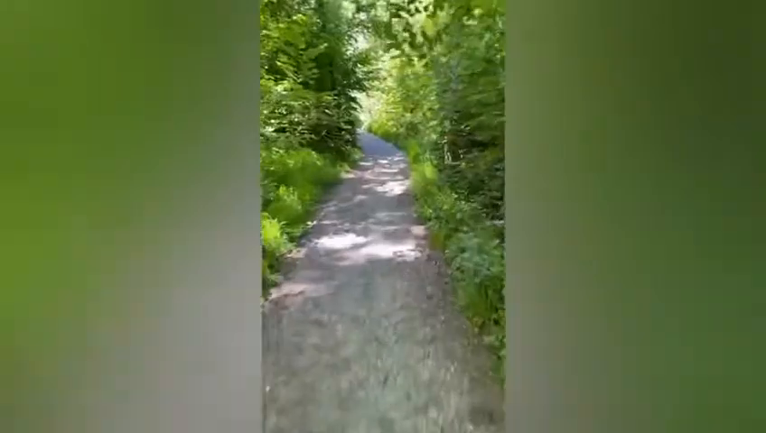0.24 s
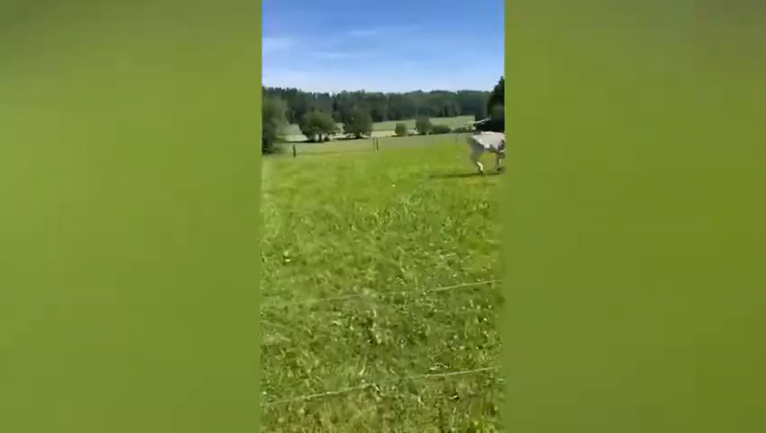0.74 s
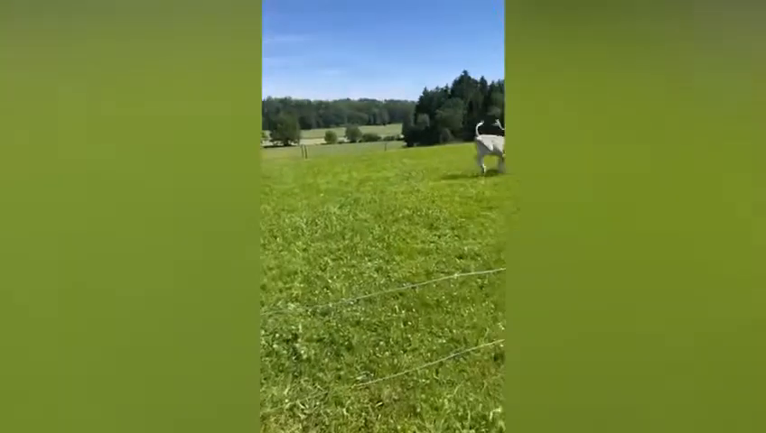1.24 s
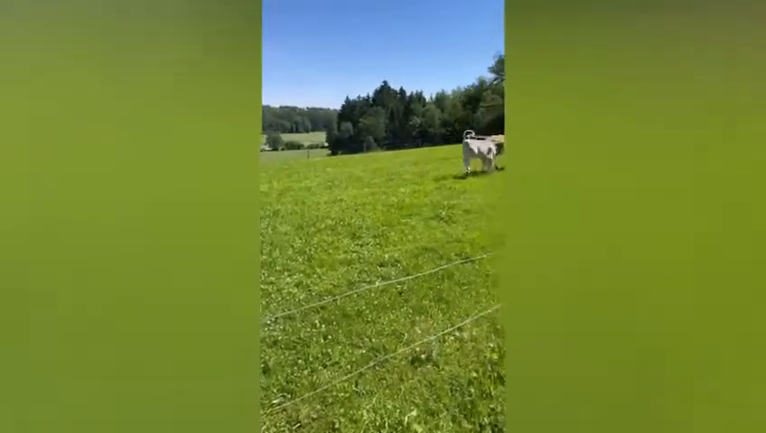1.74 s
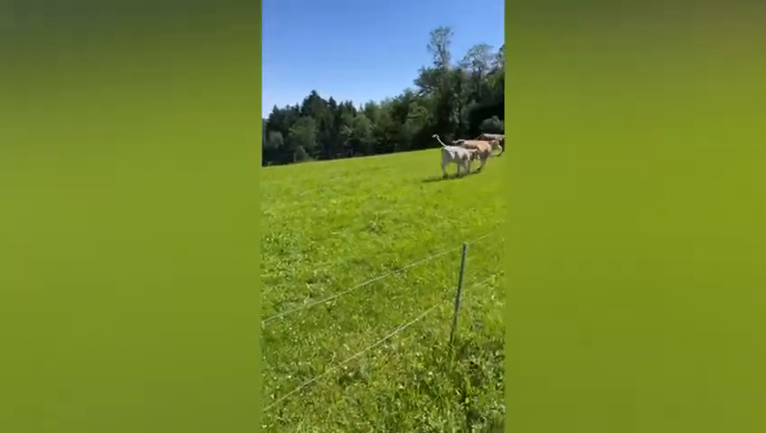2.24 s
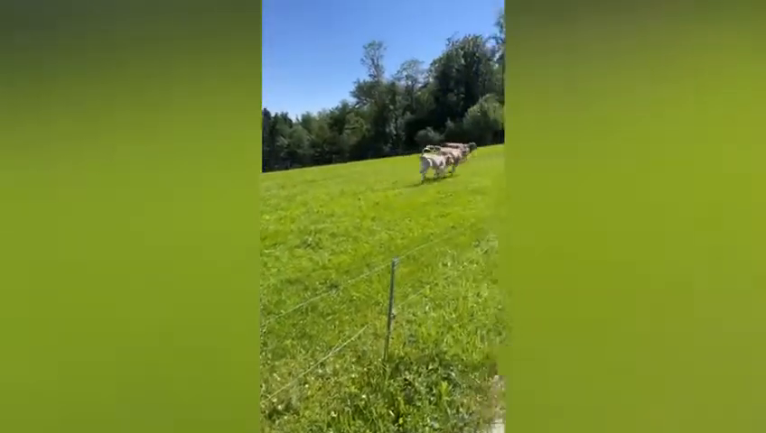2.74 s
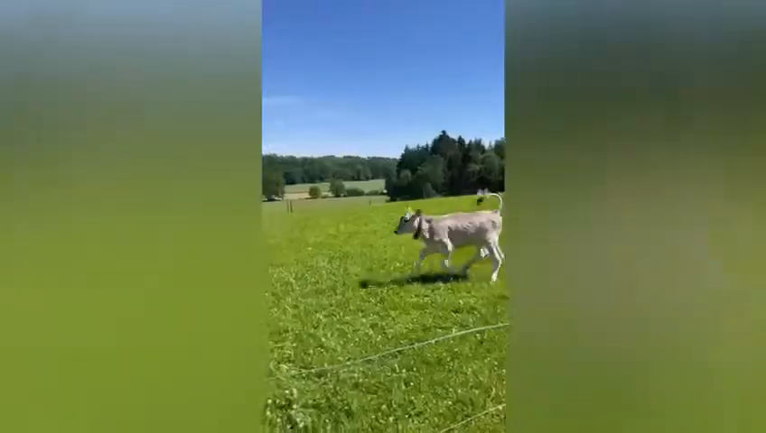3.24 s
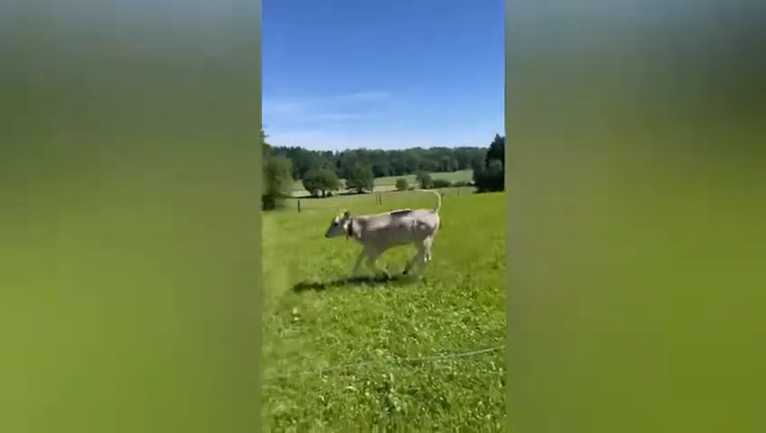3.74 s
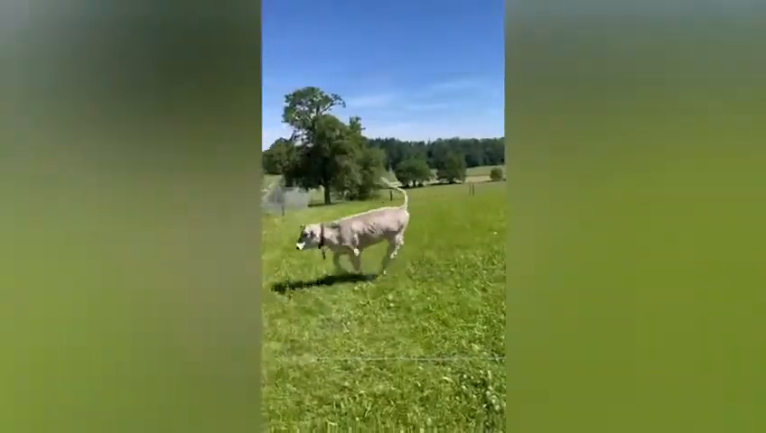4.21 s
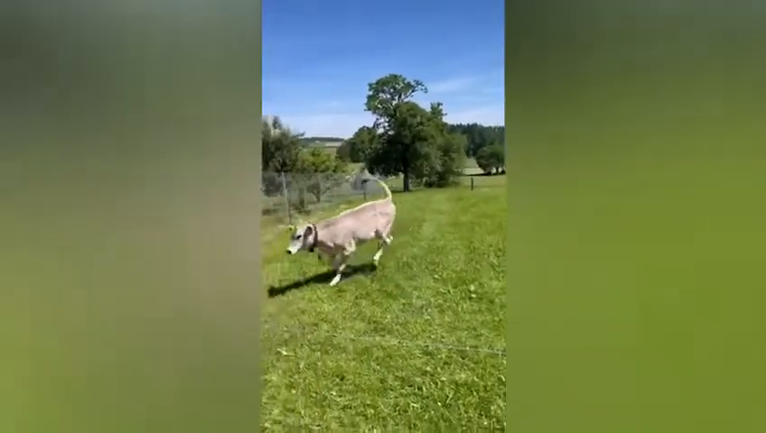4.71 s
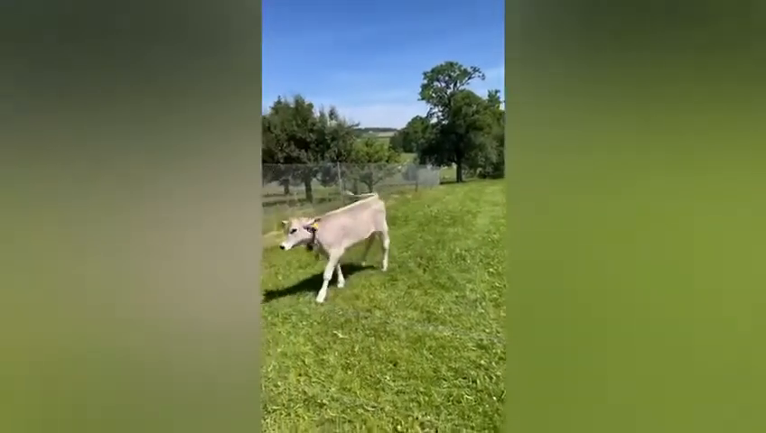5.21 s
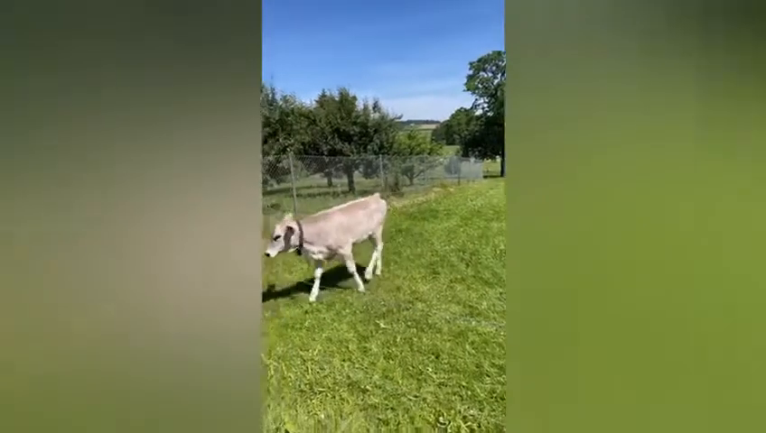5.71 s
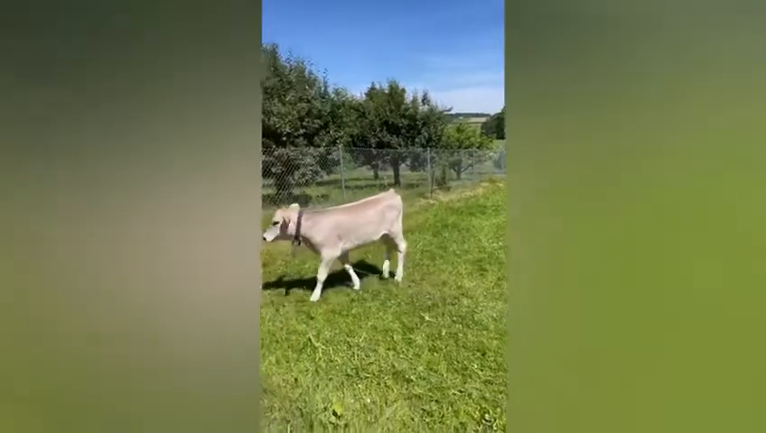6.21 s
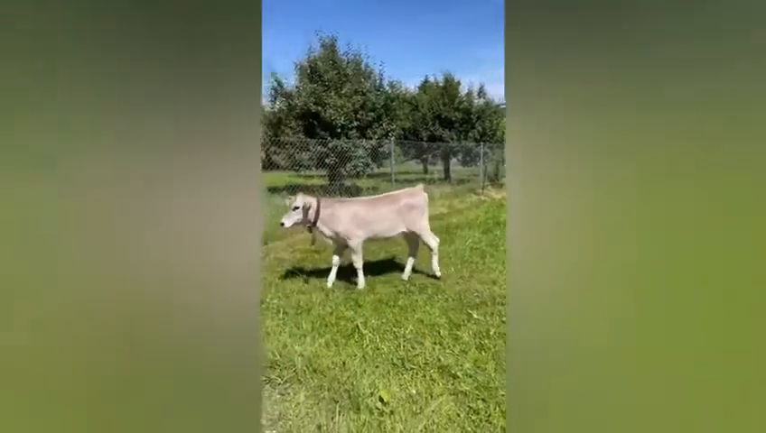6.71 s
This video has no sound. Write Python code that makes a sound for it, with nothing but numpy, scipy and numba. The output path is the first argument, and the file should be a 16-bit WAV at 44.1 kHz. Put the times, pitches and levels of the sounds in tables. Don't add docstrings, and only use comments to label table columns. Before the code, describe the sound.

Outdoors on a handheld phone: gritty gravel steps first, then a sudden change to a grassy field. Hollow, short cowbell clangs with bright metallic rim ringing and small clapper ticks tumble irregularly as cattle run by. Small birds chirp faintly behind. Another cut brings the bell of one trotting calf, its clanks thinning as it walks, while low wind buffets swell into heavy thumps. Dry open space, reduced high treble.

```python
import sys
import numpy as np
from scipy import signal
from scipy.fft import rfft, irfft
from scipy.io import wavfile
from scipy.ndimage import uniform_filter1d
from numba import njit

SR = 44100
rng = np.random.default_rng(int(sys.argv[2]) if len(sys.argv) > 2 else 0)


def int16_out(signal):
    q = np.round(np.clip(np.atleast_2d(signal).T, -1, 1) * 32767)
    wavfile.write(sys.argv[1], SR, q.astype(np.int16))


def boost(x):
    u = np.asarray(x, float) / 20
    return 10 ** u


N = 306936
TIME = np.arange(N) / SR


def colour(x, table):
    hz, db = np.transpose(table)
    f = np.maximum(np.fft.rfftfreq(x.shape[-1], 1 / SR), 1)
    gain = boost(np.interp(np.log(f), np.log(hz), db))
    return irfft(rfft(x) * gain, x.shape[-1])


def band(x, lo_hz, hi_hz):
    return signal.sosfilt(signal.butter(3, (lo_hz, hi_hz), "band", fs=SR, output="sos"), x)


def wander(rate_hz):
    hold = int(SR / rate_hz)
    steps = np.repeat(rng.standard_normal(N // hold + 1), hold)
    return 1.322 * uniform_filter1d(uniform_filter1d(steps, hold), hold)[:N]


# (f/Hz, lead/rad)
PORT_LEAD = [(0, 0), (1200, .25), (2400, .4), (3100, .8), (4500, 2.3), (4900, 3.3), (5150, 3.9),
             (5500, 5.9), (6000, 6.3), (6900, 7.3), (7900, 9.0), (9300, 9.5), (10200, 10.6), (11300, 12.0),
             (12500, 12.2)]


def ports(x, floor):
    f, lead = np.transpose(PORT_LEAD)
    half = np.exp(.5j * np.interp(np.fft.rfftfreq(N, 1 / SR), f, lead))
    spectrum = rfft(x) / np.maximum(np.abs(half.real), floor)
    return np.array([irfft(spectrum * turn, N) for turn in (half, half.conj())])


# (t/s, level/dB)
PATH_WIND = [(0, -45), (.3, -45.5), (.541, -48.5)]
FIELD_WIND = [(.54, -57), (.61, -48.5), (1.9, -50.5), (2.05, -46), (2.3, -50), (3.14, -48.5), (3.17, -42),
              (3.6, -43.5), (3.95, -37.5), (4.03, -46), (4.68, -41.5), (4.89, -40.5), (4.96, -43.5),
              (5.95, -44), (6.3, -41), (6.349, -33.5), (6.75, -30.5), (6.96, -27)]
# (level/dB in a -45 dB wind, slope/dB per dB of wind, drift/dB per s)
PATH_LAYERS = [(-43, -0.5, -6), (-36, 1.8, 5.5), (-43.5, 3, 8), (-58.5, 1.9, -3)]
FIELD_LAYERS = [(-43.5, 1, 0.12), (-48, 0.45, 0.38), (-57, 0.051, 0.73), (-64, 0.49, -0.99)]
# (f/Hz, level/dB per Hz)
PATH_BASS = [(12, -58), (20, -35), (54, 4), (97, -8.5), (130, -0.5), (189, 6), (549, -23.5), (950, -35),
             (1240, -77), (2090, -120)]
PATH_TREBLE = [(600, -37), (900, -8), (1840, 0.5), (4000, -6.5), (5700, -9.5), (8500, -14.5), (11300, -11),
               (12600, -39)]
FIELD_BASS = [(12, -49), (20, -19), (32, -25), (54, -3.5), (75, -4.5), (151, -9.5), (195, -16),
              (249, -18.5), (372, -27.5), (634, -26), (950, -28.5), (1240, -89), (2090, -120)]
FIELD_TREBLE = [(600, -56), (900, -6.5), (1250, -8), (2000, -15), (3500, -18.5), (8500, -22), (11000, -18),
                (12600, -48)]
# (f/Hz, level/dB)
WIND_WIDTH = [(30, -28.5), (125, -22), (250, -27), (500, -6.5), (1000, -6.5), (2500, -9.5), (12000, -12)]
# (f/Hz, level/dB)
LEFT_LEAN = [(150, -58), (500, -10), (1500, -20)]


def air(wind, layers, bass, treble, flicker_db):
    strength_db = np.interp(TIME, *np.transpose(wind)) + 45
    levels = [db + slope * strength_db + drift * TIME for db, slope, drift in layers]
    mid, side = rng.standard_normal((2, N))
    side = colour(side, WIND_WIDTH) + colour(mid, LEFT_LEAN)
    noise = ports(mid, 0.6) + side * np.array([[1], [-1]])
    low, high = colour(noise, bass), colour(noise, treble)
    out, gust = 0, wander(11)
    bands_hz = (20, 89.7), (110, 388), (350, 946)
    for db, (lo_hz, hi_hz), flicker in zip(levels, bands_hz, flicker_db):
        part = band(low, lo_hz, hi_hz)
        part = part / uniform_filter1d(np.abs(part.mean(0)), size=2500) ** .35
        out = out + part / part.mean(0).std() * boost(db + flicker * wander(14) + 1.5 * gust)
    hiss = high / band(high, 1780, 2880).mean(0).std()
    out = out + hiss * boost(levels[3] + 5.0 + 1.2 * wander(32))
    return out * ((TIME >= wind[0][0]) & (TIME <= wind[-1][0]))


# (t/s, level/dB, f/Hz, thud level/dB, splinter level/dB)
GRAVEL_CRACKS = [(0.0385, -27.5, 2600, -64, -67.5), (0.0894, -28, 1840, -56, -58),
                 (0.16, -25, 2130, -57, -50), (0.1984, -36, 1800, -42, -41.5), (0.207, -31, 1000, -35, -55),
                 (0.3286, -40, 2290, -52, -66), (0.3626, -31, 2130, -56, -70),
                 (0.4105, -46, 2190, -61, -65), (0.4244, -22.5, 2230, -62, -59),
                 (0.4544, -30, 2850, -53, -62), (0.476, -45, 1500, -44, -57), (0.5053, -37, 2480, -64, -60),
                 (0.5262, -23, 1830, -28.5, -49)]


def gravel():
    out = np.zeros(N)
    t = TIME[:1500]
    for s, db, hz, thud_db, splinter_db in GRAVEL_CRACKS:
        k = int(s * SR)
        crack = boost(db - 2.5) * np.sin(2 * np.pi * hz * t) * np.exp(-t * hz / 2.6)
        thud = boost(thud_db + 2.5) * np.sin(2 * np.pi * 640 * t) * np.exp(-t / 0.0048)
        splinter = boost(splinter_db + 7.5) * rng.standard_normal(1500) * np.exp(-t / 0.0084)
        out[k:k + 1500] += crack + thud + splinter
    grains = (rng.random(N) < 900 / SR) * rng.standard_normal(N)
    grains = grains * boost(4.5 * wander(45)) * (TIME < PATH_WIND[-1][0])
    return out + boost(-30.5) * band(grains, 1230, 3200)


# (t/s, level/dB, f/Hz, length/cycles)
EDDIES = [(.215, -24.5, 327, 2.8), (.302, -26, 210, 3.1), (.385, -27, 193, 4), (4.869, -25.5, 70.6, 1.8),
          (5.3, -34, 70, 2.5), (6.122, -24, 80.6, 1.2), (6.338, -20.5, 84, 2.5), (6.581, -15, 84, 2.1),
          (6.645, -20, 84, 1.4), (6.679, -16.5, 77, 1.8), (6.711, -20, 128, 1), (6.801, -26, 71.5, 2),
          (6.859, -12.5, 109, 0.82), (6.921, -12.5, 62.9, 1.7)]


def buffets():
    out = 0
    for s, db, hz, cycles in EDDIES:
        swell = np.exp(-((TIME - s) * hz * 2.4 / cycles) ** 2)
        out = out + boost(db) * swell * np.sin(2 * np.pi * hz * (TIME - s))
    return out


# (t/s, clang level/dB, third mode level/dB, rim level/dB)
HERD_CONTACTS = [(0.553, -46, -64.5, -47), (0.5822, -45, -64, -40.5), (0.618, -11.5, -33.5, -36.5),
                 (0.6437, -18, -31.5, -37.5), (0.7355, -14, -30, -23), (0.7677, -23.5, -39, -24),
                 (0.833, -38.5, -51, -36.5), (0.9116, -26, -33, -23.5), (1.0229, -34.5, -43, -31.5),
                 (1.099, -43.5, -53.5, -35), (1.181, -39.5, -53, -26), (1.1999, -13.5, -37, -40.5),
                 (1.236, -20.5, -42.5, -39), (1.4095, -24, -27.5, -33.5), (1.5553, -42, -48.5, -33),
                 (1.6136, -17, -35.5, -32), (1.7613, -37, -51, -54), (1.8183, -34.5, -54, -50),
                 (1.8567, -35, -43, -32.5), (1.927, -54, -53, -39.5),
                 (1.9758, -21, -52, -44), (2.0231, -20.5, -21, -30), (2.0803, -32.5, -33.5, -28),
                 (2.137, -11.5, -33, -33), (2.166, -25.5, -25.5, -38.5), (2.3484, -22, -39, -41),
                 (2.3764, -39, -38.5, -35), (2.395, -29, -32.5, -37.5), (2.4565, -27.5, -39, -44.5),
                 (2.5387, -23.5, -51.5, -35), (2.613, -22.5, -36, -35.5), (2.6476, -32, -39, -38),
                 (2.824, -28.5, -40.5, -47.5), (2.884, -32.5, -44.5, -48), (3.066, -37, -47.5, -43.5),
                 (3.1233, -25, -22, -26)]
CALF_CONTACTS = [(3.1539, -30.5, -33.5, -43.5), (3.203, -29.5, -39.5, -36.5), (3.2441, -24.5, -37, -24.5),
                 (3.2871, -37.5, -52, -33.5), (3.335, -44, -48.5, -35.5), (3.368, -33.5, -33, -26.5),
                 (3.405, -28.5, -45, -32), (3.469, -9.5, -29.5, -33), (3.5419, -21, -39, -36),
                 (3.5635, -40, -45, -38.5), (3.5853, -31, -51, -48.5), (3.71, -23.5, -46, -35),
                 (3.755, -45, -55.5, -28), (3.8288, -38, -47, -39.5), (3.8472, -36, -42, -42.5),
                 (3.88, -33.5, -47, -41), (3.9176, -35.5, -50.5, -38.5), (3.946, -31, -59, -36.5),
                 (4.013, -12, -33, -34), (4.0636, -9, -36, -39.5), (4.1411, -15, -34, -44.5),
                 (4.239, -19.5, -44.5, -41), (4.3602, -29.5, -41.5, -28), (4.3899, -35, -49, -39),
                 (4.442, -32, -61, -30.5), (4.4738, -18, -34, -30), (4.5844, -20.5, -31.5, -34.5),
                 (4.7922, -65, -50.5, -49.5), (4.8579, -7.5, -34, -30.5), (4.8863, -25.5, -35, -40.5),
              (4.953, -39.5, -48, -29.5), (4.9712, -18.5, -31, -30), (5.036, -25.5, -42, -24.5),
              (5.1014, -32.5, -34, -34.5), (5.1245, -21, -42, -35.5), (5.1846, -24.5, -42, -35.5),
              (5.3656, -33.5, -62.5, -64.5), (5.4764, -34.5, -53.5, -74), (5.5727, -22.5, -37.5, -49.5),
              (5.6073, -39, -55, -56.5), (5.9204, -45.5, -69, -51.5), (5.9811, -21.5, -34, -39),
              (6.0222, -24.5, -44, -45), (6.0548, -30.5, -53.5, -50), (6.346, -18.5, -34.5, -42.5),
              (6.4431, -16.5, -39.5, -43), (6.4938, -27.5, -61, -62.5), (6.5412, -30, -48.5, -41.5),
              (6.724, -14, -29, -27.5), (6.7847, -16.5, -31.5, -36), (6.8103, -22.5, -37.5, -40),
              (6.8611, -27, -44, -50), (6.8953, -29.5, -51.5, -58)]


def contacts():
    return np.transpose(HERD_CONTACTS + CALF_CONTACTS)


# (t/s, f/Hz, left minus right level/dB)
BELL_MOTION = [
    (0.602, 3142, -3),
    (0.79, 3133, -1),
    (3.15, 3127, 1.5),
    (3.157, 3141, -0.5),
    (5.547, 3159, 3),
    (6.95, 3138, 2),
]


def motion():
    s, hz, pan_db = np.transpose(BELL_MOTION)
    rest_hz = 3165
    return np.interp(TIME, s, hz) / rest_hz, np.interp(TIME, s, pan_db)


@njit
def ring(at, size, jump, turn, fade, rise, choke):
    out, old, new, push, k = np.zeros(len(turn)), 0j, 1e-9 + 0j, 0j, 0
    for i in range(len(turn)):
        if k < len(at) and i >= at[k]:
            fresh = 1 - min(abs(new) / size[k], 1.)
            push = size[k] * np.exp(1j * (np.angle(new) * (1 - fresh) + jump[k] * fresh))
            old, new, k = old + new, 1e-9 * push, k + 1
        push *= turn[i] * rise
        new = new * turn[i] * fade + push * (1 - rise)
        old *= turn[i] * choke
        out[i] = (new + old).imag
    return out


def modes(s, db, table, shift, rise_ms, scatter_db, wobble, flutter_db, swing_hz):
    table = np.array(table)
    chance = rng.standard_normal((len(s), len(table), 2))
    share = boost(table[:, 1] + scatter_db * chance[..., 0])
    size = boost(db)[:, None] * share / np.sqrt(np.sum(share ** 2, axis=1, keepdims=True))
    jump = scatter_db / 3 * chance[..., 1]
    at = (s * SR).astype(np.int64)
    edge = np.exp(-1000 / (rise_ms * SR))
    out = 0
    for k, (hz, _, t60) in enumerate(table):
        shiver = 0.85 * wander(swing_hz) + .6 * wander(18)
        turn = np.exp(2j * np.pi * hz * shift * (1 + wobble * shiver) / SR)
        fade = 1000 ** (-1 / (t60 * SR))
        tone = ring(at, size[:, k].copy(), jump[:, k], turn, fade, edge, edge ** 2)
        out = out + tone * boost(flutter_db * np.roll(shiver, N // 3))
    return out


# (f/Hz, level/dB, t60/s)
WALL_MODES = [
    [(1242.6, 3.5, 0.09), (1277.2, -7, 0.098), (1240.5, -17, 0.35), (1016, -35.5, 0.68), (1375, -14, 0.052),
     (1580, -19.5, 0.036)],
    [(2348, 0.1, 0.54)],
    [(3162.4, -9, 0.9), (3070, -9.5, 0.064), (3180, -12.5, 0.18)],
    [(4592, -0.5, 0.85), (4500, -6.5, 0.087)],
]
# (t/s, level/dB)
FOURTH_FACING = [(.7, 1), (.83, 4), (1.3, -8), (1.75, -3.5), (2.15, -10.5), (2.32, -1.5), (2.95, -1),
                 (3.458, -2), (3.8, 3.5), (3.97, -7), (4.27, -2), (4.45, 10.5), (5.19, 3.5), (5.449, 7),
                 (6.3, 10), (6.55, -0.5)]


def wall_clang(s, clang_db, third_db, rim_db, shift):
    second_db = clang_db - 31.5
    fourth_db = third_db + 0.4 * (rim_db - third_db) - 16.5
    facing = boost(np.interp(TIME, *np.transpose(FOURTH_FACING)))
    levels, gains = (clang_db, second_db, third_db, fourth_db), (1, 1, 1, facing)
    rises_ms, lifts_db = (4.17, 1.1, 2.3, 0.17), (3.94, 1.6, 1.7, 4.15)
    flutters_db = 0.22, 1.5, 1.8, 5.2
    out = 0
    for db, gain, table, rise_ms, lift_db, flutter_db in zip(
            levels, gains, WALL_MODES, rises_ms, lifts_db, flutters_db):
        out = out + gain * modes(s - .003, db + lift_db, table, shift, rise_ms, 1.95, .0012, flutter_db, 70)
    return out


# (t/s, level/dB)
HERD_HUM = [(.6, -69), (.64, -59), (.82, -41), (.94, -42.5), (1.2, -50), (1.38, -65.5), (1.43, -45.5),
            (1.59, -65), (1.62, -54), (1.71, -78), (1.89, -54), (2.07, -68), (2.15, -38.5), (2.33, -73),
            (2.65, -51), (2.86, -63), (2.95, -83), (3.15, -62)]
CALF_HUM = [(3.16, -59), (3.76, -40.5), (3.97, -51.5), (4.28, -38.5), (4.43, -59), (4.64, -52), (4.83, -60),
            (4.86, -38), (5.04, -60), (5.19, -45), (5.52, -103), (5.62, -71), (5.88, -103), (5.99, -52.5),
            (6.29, -95), (6.35, -54), (6.92, -66.5), (6.95, -80)]


def bell_hum(start_s, shift):
    gain = boost(np.interp(TIME, *np.transpose(HERD_HUM + CALF_HUM)))
    sway = 1 + 0.001455 * wander(15)
    tone = np.sin(2 * np.pi * 2362.4 * np.cumsum(shift * sway) / SR)
    return gain * boost(3.0 + 3.15 * wander(22)) * (TIME > start_s) * tone


# (f/Hz, ..)
RIM_MODES = [
    (4967, 5096, 5680),
    (6263, 6652, 6846, 6933, 7429, 8163, 8422, 8703),
    (8898, 9265, 9546, 9830, 9956, 10172, 10496, 10841, 11381, 11619, 12245),
]
# (level/dB, ..)
RIM_LEVELS = [
    (0, -8.5, -14.5),
    (-15, -4, 0.5, -1, -22.5, -8, -5.5, -13),
    (-7.5, -7, -5, -10, -5, -0.5, 0.5, 4.5, 1, -6, -29),
]
# (t60/s, ..)
RIM_T60 = (0.79, 0.34, 0.26)


def rim_shimmer(s, levels, shift):
    lifts_db, roughness = (0, -1.5, 0), (.45, .9, 1.05)
    out = 0
    for db, hz, share_db, t60, lift_db, rough in zip(
            levels, RIM_MODES, RIM_LEVELS, RIM_T60, lifts_db, roughness):
        table = [(f, d, t60) for f, d in zip(hz, share_db)]
        scatter_db, wobble, flutter_db = 5.65 * rough, .0028 * rough, 5.94 * rough
        out = out + modes(s - .002, db + lift_db, table, shift, 0.25, scatter_db, wobble, flutter_db, 150)
    return out


def rim_haze(s, top_db):
    last = np.maximum(np.searchsorted(s, TIME) - 1, 0)
    fading = boost(top_db[last] - 4.0 - 60 * (TIME - s[last]) / 0.56) * (TIME > s[0])
    noise = band(band(rng.standard_normal(N), 7700, 11300), 8000, 11500)
    return noise * boost(3.2 * wander(60)) * uniform_filter1d(fading, size=40)


def clapper_ticks(s, rim_db):
    fall_db_s = 152
    lift = np.diff(rim_db, prepend=-99) + fall_db_s * np.diff(s, prepend=0)
    ticks = np.zeros(N)
    tick_gain = boost(0.45 * rim_db - 35 + 1.8 * s)
    ticks[((s - .0015) * SR).astype(int)] = tick_gain * np.clip(lift / 15.5, .08, 1)
    t = TIME[:2500]
    burst = rng.standard_normal(2500) * (np.exp(-t / 0.005) + 4.0 * np.exp(-t / 0.00051))
    return band(signal.fftconvolve(ticks, burst)[:N], 1000, 22000)


# (t/s, level/dB)
GLANCING_BLOWS = [
    (.912, -43),
    (3.246, -44),
    (3.757, -46.5),
    (4.954, -50),
    (5.037, -38),
]


def glancing_buzz():
    buzz = sum(boost(db) * np.exp(-np.abs(TIME - at) / 0.042) * (TIME > at) for at, db in GLANCING_BLOWS)
    return buzz * band(rng.standard_normal(N), 4900, 7400) * boost(9.5 + 3.3 * wander(120))


def bell():
    s, clang_db, third_db, rim_db = contacts()
    shift, pan = motion()
    top_db = rim_db - 4 - 0.12 * (rim_db + 31.0)
    out = wall_clang(s, clang_db, third_db, rim_db, shift) + bell_hum(s[0], shift)
    out = out + rim_shimmer(s, (rim_db - 13, rim_db, top_db), shift)
    out = out + clapper_ticks(s, rim_db) + glancing_buzz()
    return (ports(out, 0.43) + ports(rim_haze(s, top_db), 0.31)) * boost(np.array([pan, -pan]) / 2)


def ground_echoes(near):
    tails = rng.standard_normal((2, 12000)) * np.exp(-TIME[:12000] / 0.049) * boost(-45.0)
    return signal.fftconvolve(near.mean(0)[None], tails)[:, :N]


# (t/s, f/Hz, level/dB)
ENGINE_LINE = [
    (0.599, 264.8, -85),
    (2.46, 250.6, -52),
    (3.16, 260, -58),
]


def engine():
    s, hz, db = np.transpose(ENGINE_LINE)
    gain = boost(np.interp(TIME, s, db) + 2.5) * ((TIME > s[0]) & (TIME < s[-1]))
    return gain * np.sin(2 * np.pi * np.cumsum(np.interp(TIME, s, hz)) / SR)


# (t/s, length/s, start f/Hz, end f/Hz, level/dB)
BIRD_GLIDES = [(1.139, 0.0068, 3830, 4300, -65), (1.164, 0.013, 4500, 4020, -52),
               (1.173, 0.016, 4120, 4500, -61), (1.19, 0.023, 3270, 4330, -49),
               (1.21, 0.018, 4300, 3500, -63), (1.377, 0.03, 3200, 4180, -53),
               (1.287, 0.037, 3600, 4250, -54), (2.535, 0.028, 3450, 3900, -52),
               (2.557, 0.045, 3900, 3470, -52), (2.828, 0.042, 4000, 3540, -54),
               (2.881, 0.038, 4000, 3480, -52), (2.98, 0.042, 3800, 3716, -49),
               (3.02, 0.028, 3550, 3450, -50.5), (3.054, 0.013, 3370, 3180, -64)]


def birds():
    out = np.zeros(N)
    for s, length, from_hz, to_hz, db in BIRD_GLIDES:
        k, n = int(s * SR), int(length * SR)
        phase = 2 * np.pi * np.cumsum(np.linspace(from_hz, to_hz, n)) / SR
        out[k:k + n] += boost(db) * np.hanning(n) * np.sin(phase)
    out = out * (1 + 0.5 * wander(490))
    tails = rng.standard_normal((2, 9000)) * np.exp(-TIME[:9000] / 0.026) * boost(-17.5)
    flock = band(rng.standard_normal((2, N)), 3250, 4600) * boost(2.5 * wander(40))
    bouts = (1.28, 0.188, -40.5), (2.58, 0.06, -48), (2.93, 0.13, -43)
    busy = sum(boost(db) * np.exp(-((TIME - s) / span) ** 4) for s, span, db in bouts)
    return out + signal.fftconvolve(out[None], tails)[:, :N] + flock * busy


def scene():
    path = air(PATH_WIND, PATH_LAYERS, PATH_BASS, PATH_TREBLE, (1.5, 1.5, 1.5))
    field = air(FIELD_WIND, FIELD_LAYERS, FIELD_BASS, FIELD_TREBLE, (1.5, 1.2, .8))
    near = bell()
    return path + field + ports(gravel(), 0.54) + buffets() + near + ground_echoes(near) + engine() + birds()


# (f/Hz, level/dB)
FAINT_LIMIT = [(1300, -130), (1450, -80.5), (3000, -83.5), (6000, -88.5), (7300, -86.5), (7700, -81),
               (9300, -80), (9700, -85.5), (12000, -87)]


def thin(x, mask_db, scatter_db, busy_gain):
    f, t, z = signal.stft(x, SR, nperseg=2048)
    patch = (22 * np.log(np.maximum(f, 100) / 100)).astype(int)
    starts = np.flatnonzero(np.diff(patch, prepend=-1))
    width = np.diff(starts, append=len(f))
    power = np.add.reduceat(np.abs(z) ** 2, starts) / width[:, None]
    treble = f[starts, None] > FAINT_LIMIT[1][0]
    hidden = uniform_filter1d(power, size=13, axis=0) * boost(mask_db) ** 2 * treble
    faint = boost(np.interp(f[starts], *np.transpose(FAINT_LIMIT)))[:, None] ** 2 * boost(1.3 * (t - t.mean()))
    faint = faint * (1 + busy_gain * power[f[starts] < 250].sum(0))
    limit = (faint + hidden) * boost(scatter_db * rng.standard_normal(power.shape)) ** 2
    kept = np.repeat(power > limit, width, axis=0)
    return signal.istft(z * kept, SR, nperseg=2048)[1][:N]


def top_cut(x):
    return signal.sosfilt(signal.butter(12, 12520, fs=SR, output="sos"), x)


def record(dry):
    mid = thin(dry.mean(0), -19, 2.5, boost(68.0))
    side = thin((dry[0] - dry[1]) / 2, -32.0, 3.3, boost(102.0))
    low_pass = signal.ellip(8, .2, 70, 12400, fs=SR, output="sos")
    mix = signal.sosfilt(low_pass, [mid + side, mid - side])
    return top_cut(mix)


dry = scene()
out = record(dry)
int16_out(out)
```